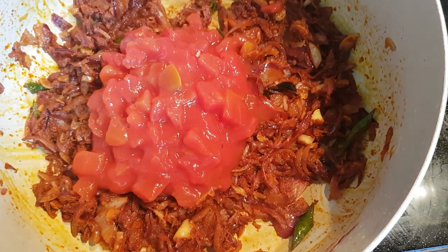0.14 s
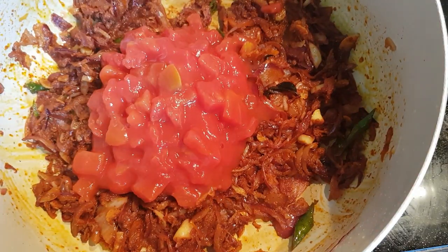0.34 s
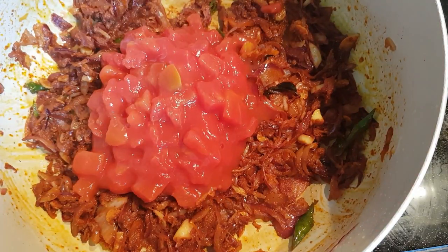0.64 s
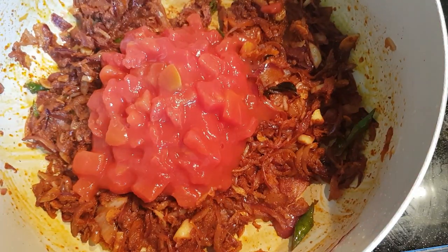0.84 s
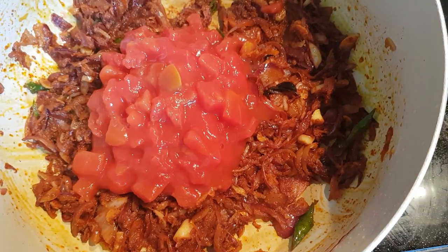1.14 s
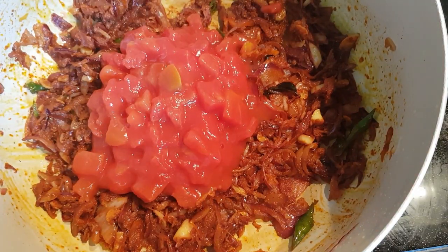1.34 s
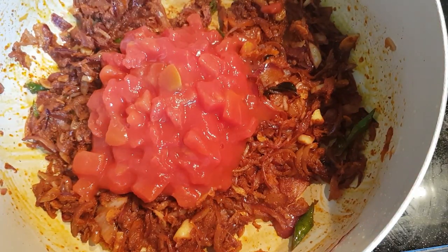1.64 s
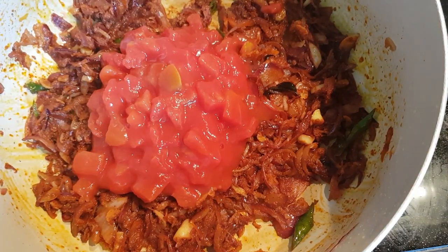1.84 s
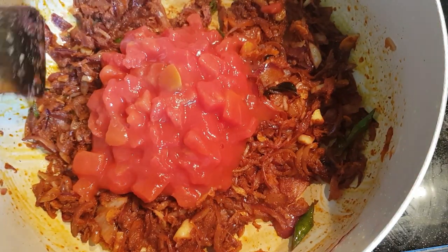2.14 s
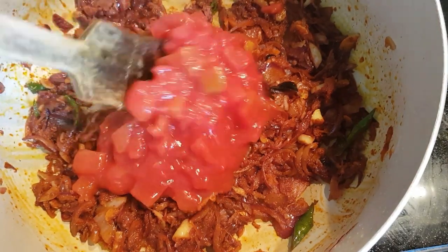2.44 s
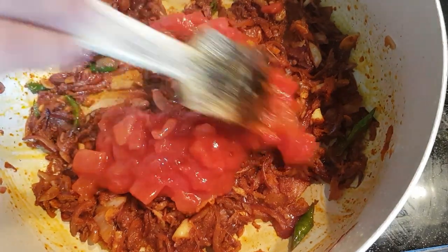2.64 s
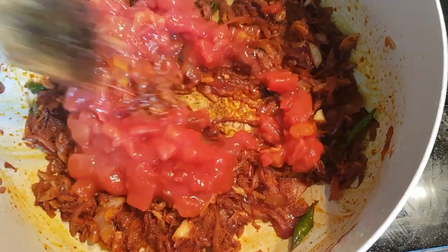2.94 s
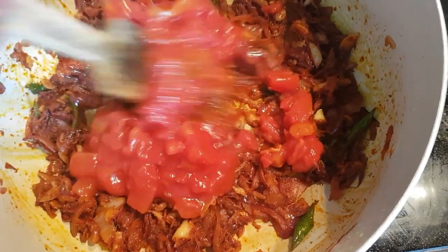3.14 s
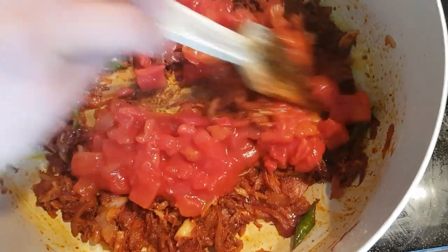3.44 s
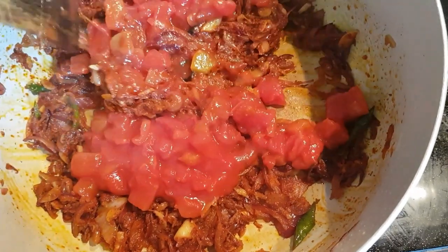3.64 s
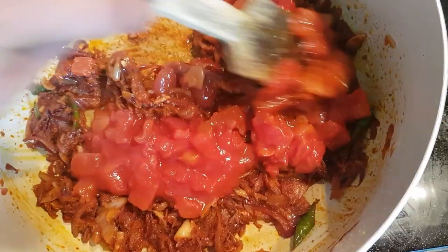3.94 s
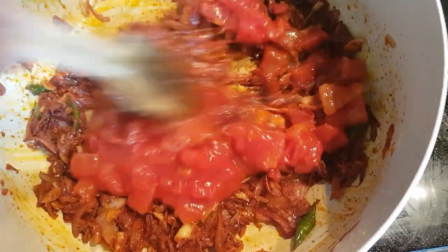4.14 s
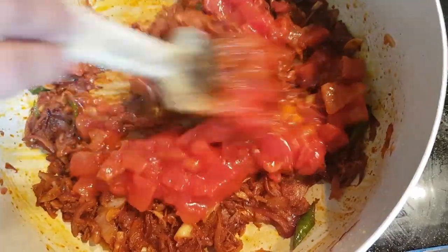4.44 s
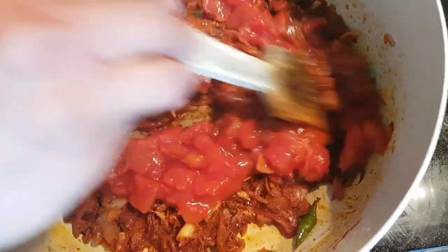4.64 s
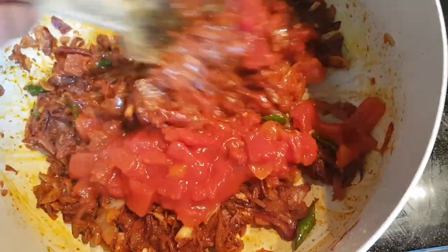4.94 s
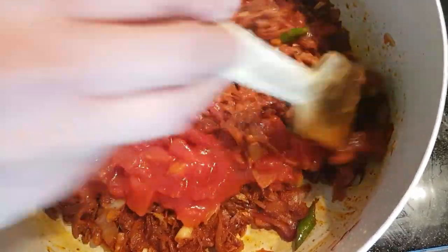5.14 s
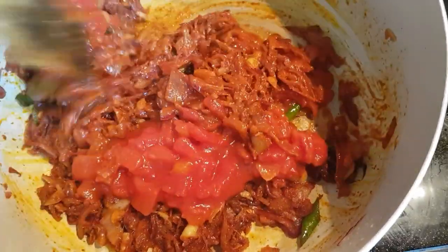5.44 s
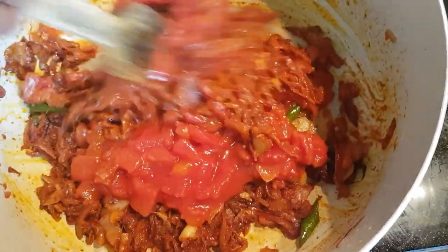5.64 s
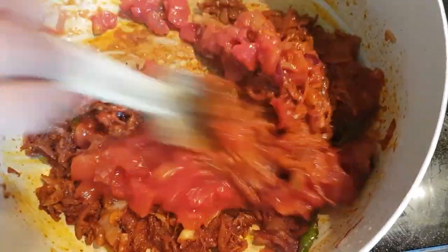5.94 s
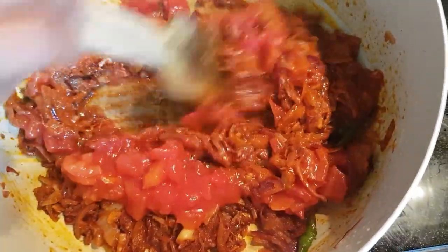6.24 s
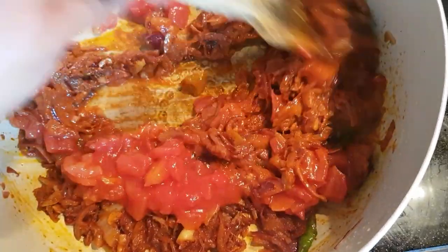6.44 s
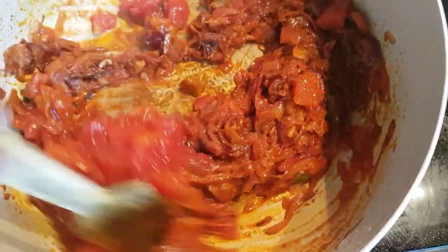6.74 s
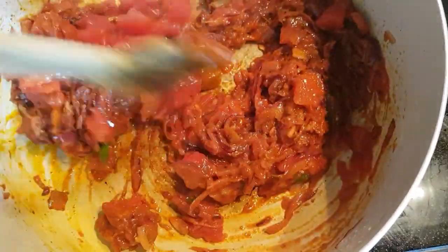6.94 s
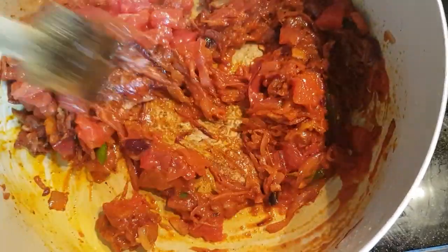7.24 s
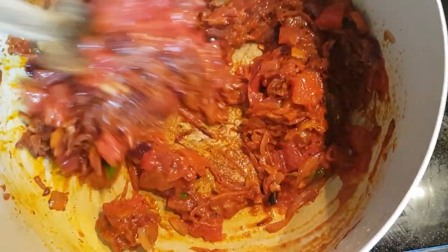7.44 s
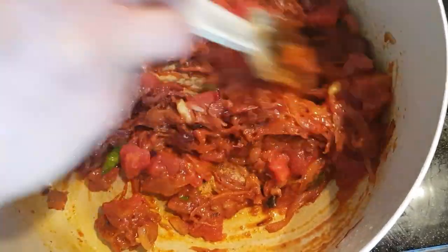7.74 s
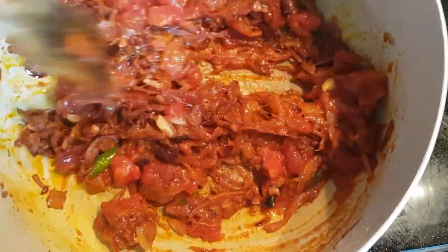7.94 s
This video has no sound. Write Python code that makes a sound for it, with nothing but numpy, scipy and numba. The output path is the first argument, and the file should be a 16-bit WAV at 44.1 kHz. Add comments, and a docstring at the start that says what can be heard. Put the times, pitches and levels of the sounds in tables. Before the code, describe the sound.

Chopped tomatoes and onions sizzle and bubble in a wide metal pan, close to the microphone, with a faint low kitchen fan hum throughout. Oil spits a few times early on. Around 1 second a wooden spatula gives a quick cluster of knocks, and from 2.3 seconds it stirs with irregular clacks and chatter, the pan thudding lightly on its stove grate. Near 3 seconds the frying swells and a raspy steam whistle rises, strongest around 3.5 seconds, returning more weakly after 4. The hardest knock lands at 5 seconds, ending the whistle, and another strong one follows at 5.6. The sizzle then sinks, flaring briefly with the strokes. Two short, soft scrapes come near 6.7 seconds, then lighter knocks and a flurry of sharp spits from 7 to 8 seconds. The knocks carry a slight echo from hard kitchen walls.

```python
"""Chopped tomatoes sizzle among onions in a wide metal pan, close under a phone with two microphone
ports; a kitchen fan hums behind and oil spits now and then. From about 1 s a wooden spatula stirs,
knocking the pan, which rocks on its stove grate. Near 3 s it bares hot metal: the frying swells and
steam whistles until the hardest knock, at 5 s. The sizzle sinks as the tomato spreads and cools the pan,
and the stirring ends with two short scrapes, lighter knocks and a flurry of spits."""
import sys
import numpy as np
from scipy import signal
from scipy.fft import rfft, irfft, next_fast_len
from scipy.io import wavfile
from scipy.ndimage import uniform_filter1d
from numba import njit

SR = 44100
rng = np.random.default_rng(int(sys.argv[2]) if len(sys.argv) > 2 else 0)


def master(y):
    """Save y as 16-bit WAV."""
    cut = np.clip(np.atleast_2d(y).T, -1, 1)
    pcm = np.round(cut * 32767)  # scale
    wavfile.write(sys.argv[1], SR, pcm.astype(np.int16))


N = 356896

# The pan's modes, damped by the food on the metal. Each row: pitch in Hz, level in dB, t60 in seconds.
PAN_MODES = [(428, 16.5, 0.05), (639, 14.5, 0.065), (810, 12, 0.02), (1030, 21, 0.037), (1160, -16, 0.024),
             (1370, -6, .03), (1954, 14, 0.058), (2530, 11, 0.08), (2374, 20, 0.076), (3400, -12, 0.24),
             (3780, -36, 0.044)]


def undb(db):
    return 10 ** (np.asarray(db) / 20)


def level(x, db=0, first=None):
    """Sets the rms level, judged on the whole sound or on its first samples."""
    return x * undb(db) / np.sqrt(np.mean(x[..., :first] ** 2))


def across(points, hz):
    """Points joined on a log-frequency axis."""
    point_hz, values = np.transpose(points)
    return np.interp(np.log(hz + 1), np.log(point_hz), values)


def along(table):
    """Points joined in time: one envelope for each column after the first."""
    s, *columns = np.transpose(table)
    return [np.interp(np.arange(N) / SR, s, c) for c in columns]


def sides(db):
    """Stereo gains for a balance of left minus right in dB."""
    return undb(np.array([[db], [-db]]) / 2)


def walk(rate):
    """Random levels held 1 / rate s and smoothed twice; spread near 1."""
    hold = int(SR / rate)
    steps = np.repeat(rng.standard_normal(N // hold + 1), hold)
    return 1.3 * uniform_filter1d(uniform_filter1d(steps, hold), hold)[:N]


def clicks(rate, count):
    """Impulses of random size and timing, on average rate a second."""
    return (rng.random(count) < rate / SR) * rng.standard_normal(count)


def add(out, x, s):
    i = int(s * SR)
    out[:, i:i + x.shape[1]] += x[:, :N - i]


def fade(t, t60):
    return np.exp(-np.log(1000) * t / np.maximum(t60, .002))


@njit
def bandpass(x, hz, width):
    """State-variable band-pass with a moving centre, gain 1 at the centre."""
    y, band, low = np.empty(len(x)), 0., 0.
    for i in range(len(x)):
        g, damping = np.tan(np.pi * hz[i] / SR), width / hz[i]
        v = (band + g * (x[i] - low)) / (1 + g * (g + damping))
        band, low, y[i] = 2 * v - band, low + 2 * g * v, damping * v
    return y


def burst(t, hz, width, t60, rise_s):
    """A decaying puff of band noise, unrelated at the two ports."""
    centre = np.full(len(t), float(hz))
    noise = np.array([bandpass(n, centre, float(width)) for n in rng.standard_normal((2, len(t)))])
    return level(noise) * fade(t, t60) * (1 - fade(t, rise_s))


def ports(make, gain):
    """Two ports hear much the same bass and unrelated treble; gain is a function of Hz."""
    # Each row: frequency in Hz, share of the sound common to both ports.
    likeness = [(100, 0.93), (400, 0.74), (1000, 0.57), (2500, 0.12), (6000, 0.016)]
    left_lag_s = .0001
    size = next_fast_len(N)
    hz = np.arange(size // 2 + 1) * SR / size
    common = across(likeness, hz)
    right, unrelated = rfft(make(), size), rfft(make(), size)
    left = (common * right + np.sqrt(1 - common ** 2) * unrelated) * np.exp(-2j * np.pi * hz * left_lag_s)
    return level(irfft(np.array([left, right]) * gain(hz), size)[:, :N])


@njit
def bubbles(start, hz, size, decay, count):
    """Each bubble swells quickly and rings out as a damped sine."""
    y = np.zeros(count)
    for j in range(len(start)):
        phasor, onset = size[j] + 0j, 1.
        turn = decay[j] * np.exp(2j * np.pi * hz[j] / SR)
        for i in range(start[j], count):
            y[i] += phasor.imag * (1 - onset)
            phasor, onset = phasor * turn, onset * decay[j] ** 4
            if abs(phasor.real) + abs(phasor.imag) < size[j] / 100:
                break
    return y


def fizz(rate, spread_db, ring_s, hiss):
    """Tiny steam bubbles of every pitch, a few much louder, over a share of smooth hiss."""
    when, pitch, rarity, length = rng.random((int(rate * N / SR), 4)).T
    decay = np.exp(-np.log(1000) / (SR * ring_s * (0.59 + length)))
    size = undb(-spread_db * np.log(rarity + 0.0022))
    pops = bubbles((when * N).astype(np.int64), 200 + 15000 * pitch, size, decay, N)
    return level(pops) + hiss * rng.standard_normal(N)


def bowl(f):
    """Air in the bowl of the pan resonates: its gain at f Hz."""
    # Each row: centre in Hz, width in Hz, gain in dB.
    air_modes = [(590, 67, -6), (1020, 65, 16), (1515, 190, 0.5)]
    return 1 + sum(undb(db) / np.abs(1 + 2j * (f - hz) / width) for hz, width, db in air_modes)


def frying():
    """Fine sizzle in oil, coarser bubbling in the juice and a low simmer of pan and burner."""
    # The pan cools as the tomato spreads. Each row: time in seconds, base sizzle and bubbling in dB.
    fry_levels = [(0, -44.5, -46), (.7, -39, -44), (1.2, -39, -42), (2.1, -38.5, -45.5), (2.7, -37.5, -42),
                  (3.1, -33, -40), (3.5, -34, -39), (4.1, -34.5, -39.5), (4.6, -35, -41.5), (5.1, -41, -43),
                  (5.6, -41, -45.5), (5.9, -46, -48.5), (6.5, -45, -51), (7, -47, -53), (7.4, -48, -55.5),
                  (8.09, -49.5, -55)]
    # Each row: time in seconds, base level of the simmer in dB.
    simmer_levels = [(0, -53.5), (1, -45), (2, -48), (3, -50), (4, -46), (5, -45.5), (6, -55.5), (7, -59.5),
                     (8.09, -57)]
    # The tone of the three layers. Each row: frequency in Hz, relative spectral density in dB.
    sizzle_tone = [(1180, -20), (2000, -6), (2630, -5.5), (2760, -8), (3130, -4), (3910, -3), (6170, -3),
                   (6820, -2.5), (11500, -4), (13900, -6), (14500, -15.5)]
    bubbling_tone = [(400, -6.5), (700, -5.5), (1000, -9), (1500, -3.5), (2600, 0), (4000, -6), (7000, -16)]
    simmer_tone = [(30, 6.5), (60, -5), (110, -7), (170, -11), (300, -12), (480, -6.5), (750, -14.5),
                   (1200, -23.5)]
    sizzle = ports(lambda: fizz(rate=7000, spread_db=2.6, ring_s=.031, hiss=1.0),
                   lambda f: undb(across(sizzle_tone, f)))
    bubbling = ports(lambda: fizz(rate=9000, spread_db=1.5, ring_s=.02, hiss=1.3),
                     lambda f: undb(across(bubbling_tone, f)) * bowl(f))
    simmer = ports(lambda: rng.standard_normal(N),
                   lambda f: undb(across(simmer_tone, f)) * bowl(f) * (f < 1400))
    sizzle_db, bubbling_db = along(fry_levels)
    lift_db = flares()
    sizzle_flicker, bubbling_flicker, joint_flicker = [undb(.6 * walk(18)) for _ in range(3)]
    sizzle *= undb(sizzle_db + lift_db) * sizzle_flicker
    bubbling *= undb(bubbling_db + .8 * lift_db) * bubbling_flicker
    simmer *= undb(along(simmer_levels)[0] + 2 * walk(10))
    return sides(-2) * ((sizzle + bubbling) * joint_flicker + simmer)


def fan():
    """The fan's low hum wavers a little in pitch and level."""
    hz = 49.5 * (1 + .055 * walk(14))
    hum = np.sin(2 * np.pi * np.cumsum(hz) / SR) * undb(1.6 * walk(9))
    return sides(-1.4) * level(hum, db=-50)


def spits():
    """A drop hits hot oil: a sharp crack, then a short spray of steam."""
    # Each row: start in seconds, base level in dB, centre in Hz, left minus right in dB.
    drops = [(0.4866, -34, 5340, 0), (0.948, -30, 9050, -8), (1.153, -30, 8000, -11),
             (4.6613, -46, 2800, 2), (5.221, -36, 4070, 2), (5.258, -43, 2470, -11),
             (5.983, -27.5, 6500, -4), (6.589, -38, 5660, 1), (6.972, -38, 2480, -4),
             (7.183, -40, 7460, -11), (7.2622, -37, 3070, -7), (7.45, -34.5, 6040, -3),
             (7.492, -27, 7000, -3), (7.7746, -23.5, 7760, -5), (7.8125, -38, 6900, -10),
             (7.858, -40, 11400, 4), (7.9137, -38, 7750, -1), (7.9633, -39, 4670, -3)]
    out, t = np.zeros((2, N)), np.arange(int(.15 * SR)) / SR
    for s, db, hz, side_db in drops:
        crack = undb(4.5) * burst(t, hz, width=.6 * hz, t60=.022, rise_s=.006)
        spray = undb(-9) * burst(t, hz, width=.7 * hz, t60=.07, rise_s=.017)
        add(out, sides(side_db) * undb(db) * (crack + spray), s)
    return out


def ring(modes, t, favoured_hz, db_per_octave, spread_db, port_phase):
    """One blow's ring: the place struck favours modes near one pitch."""
    hz, db, t60 = np.transpose(modes)[:, :, None]
    detune, skew, strength, phase = rng.standard_normal((4, len(modes), 1))
    angle = 2 * np.pi * hz * (1 + .015 * detune) * t + .6 * phase
    # the ports catch the higher modes out of step
    shift = port_phase * (1 + .4 * skew) * np.minimum(hz / 1000, 1) ** 2
    db = db - np.abs(np.log2(hz / favoured_hz)) * db_per_octave + spread_db * strength
    envelope = undb(db) * fade(t, t60) * (1 - np.exp(-t * hz * 3.6))
    x = np.sum(envelope * np.sin([angle - shift, angle]), axis=1)
    return x / np.abs(x).max()


def spatula():
    """Each blow clacks dry wood, rings pan and grate, ticks, then chatters as wood drags over metal."""
    # Each row: start in seconds, levels of knock, grate and tick in dB, left minus right in dB,
    # chatter in dB against the blow, favoured pitch of the knock and of the grate in Hz.
    blows = [(0.891, -43, -62, -49, -2, -32, 600, 100), (1.163, -28.5, -41, -46, -3, -11, 990, 200),
             (0.928, -23, -33, -28.5, -4, -15.5, 865, 203), (1.155, -26.5, -39, -27, -2.5, -17, 810, 200),
             (2.264, -39, -36, -56, -5.5, -10, 450, 137), (2.301, -54, -42, -53, 7, -25, 406, 61.9),
             (2.335, -41, -35.5, -51, -2.5, -11, 1000, 99.6), (2.374, -45, -48, -43, 0, -18, 1040, 61.9),
             (2.553, -38, -28, -40, 0.5, -17.5, 382, 224), (2.58, -51, -42, -41, -7, -27, 388, 67.3),
             (3.157, -31, -31, -33, 0, -13.5, 830, 153), (3.791, -43, -33.5, -31, 1, -29, 1060, 64.6),
             (4.405, -43, -41, -34, -2, -4.5, 980, 74), (4.694, -41, -32.5, -61, 1.5, -16, 635, 201),
             (4.971, -10.5, -26, -26, -2.5, -35, 870, 153), (5.245, -35.5, -39, -54, -4, -23, 1030, 234),
             (5.278, -32.5, -30.5, -37.5, 1.5, -18, 369, 256),
             (5.591, -17.5, -25, -25, -2.5, -33, 1045, 248), (5.654, -61, -32, -41, 2, -9, 956, 113),
             (5.958, -60, -46, -39, -4, -5, 1040, 61.9), (6.198, -45.5, -35, -40, 2.5, -10, 638, 144),
             (6.618, -52, -48.5, -58, -3, -12, 1380, 120), (7.142, -37, -55, -39.5, -3, -21, 644, 118),
             (7.158, -34, -32, -53, 1, -17, 655, 121), (7.46, -45, -33.5, -49, -4, -8.5, 358, 240),
             (7.491, -28.5, -35.5, -33.5, -1.5, -22, 616, 243), (7.648, -60, -44.5, -59, 2.5, -9, 563, 121)]
    # Modes of the spatula and the stove grate. Each row: pitch in Hz, level in dB, t60 in seconds.
    wood_modes = [(526, -0.5, 0.015), (864, 4, 0.011), (1060, 0, 0.019), (1520, 0.5, 0.03),
                  (2090, -9.5, 0.057), (3350, 1, 0.014)]
    grate_modes = [(72, 1.5, 0.25), (108, 3, 0.14), (123.7, 3, 0.11), (190, -4.5, 0.095),
                   (199.1, -2.5, 0.19), (237, 6.5, 0.098), (309, -3.5, 0.1)]
    # Blows on bare metal sound higher and ring more.
    # Each row: favoured pitch in Hz, pan level in dB against the wood.
    bare_metal = [(400, -8.5), (700, -5), (1000, -2.5), (1040, 15)]
    out, t = np.zeros((2, N)), np.arange(int(.3 * SR)) / SR
    for s, knock_db, grate_db, tick_db, side_db, chatter_db, knock_hz, grate_hz in blows:
        force = clicks(900, len(t)) * undb(chatter_db) * fade(t, t60=.55)
        force[0] = -1  # the blow itself, ahead of its chatter
        # food between wood and metal lengthens the push and dulls the knock; hard blows touch briefly
        contact_s = .00024 if knock_db > -32 else .00077
        push = np.sin(np.pi * np.clip(t[:200] / contact_s, 0, 1))
        wood = ring(wood_modes, t, knock_hz, db_per_octave=5.5, spread_db=.33, port_phase=1.67)
        pan = ring(PAN_MODES, t, knock_hz, db_per_octave=13, spread_db=1, port_phase=1.78)
        pan *= undb(np.interp(knock_hz, *np.transpose(bare_metal)))
        knock = level(signal.fftconvolve(wood + pan, push[None])[:, :len(t)], knock_db, first=300)
        grate = ring(grate_modes, t, grate_hz, db_per_octave=5.4, spread_db=1.24, port_phase=2.3)
        grate = level(grate, grate_db, first=700)
        tick = undb(tick_db) * burst(t, hz=2480, width=1870, t60=.13, rise_s=.002)
        rocking = force * np.where(t > 0, .45, 1)  # only part of the chatter reaches grate and tick
        blow = signal.fftconvolve(knock, force[None]) + signal.fftconvolve(grate + tick, rocking[None])
        add(out, sides(side_db) * blow, s)
    return out


def flares():
    """Juice meets bare hot metal: the frying's lift in dB, quick up and a little slower down."""
    # Each row: time of the peak in seconds, lift in dB.
    peaks = [(.94, 3.5), (2.55, 1), (3.2, 3), (3.58, 4), (3.85, 2.5), (4.3, 2), (4.8, 4), (5.3, 1.5),
             (5.45, 2), (5.72, 3.5), (6.2, 3.5), (6.9, 2), (7.26, 4.5), (7.55, 5.5), (7.93, 4)]
    rise_s, fall_s = .076, .089
    s, db = np.transpose(peaks)[:, :, None]
    t = np.arange(N) / SR - s
    return np.sum(db * np.exp(-(t / np.where(t < 0, rise_s, fall_s)) ** 2), axis=0)


def rasp(hz, width):
    """Bursting bubbles: clicks of unequal size over smooth hiss, through one resonance."""
    crackle = clicks(3000, N) * undb(1.5 * rng.exponential(size=N))
    return level(bandpass(level(crackle) + .72 * rng.standard_normal(N), hz, width))


def steam():
    """Steam whistles under the lifted heap, through two gaps that change as it slides."""
    # Each row: time in seconds, lower and upper resonance in Hz, base level in dB.
    gaps = [(2.8, 1400, 2500, -47), (3.2, 1520, 2620, -40.5), (3.32, 1570, 2880, -34.5),
            (3.45, 1770, 2860, -34), (3.56, 1950, 3000, -34.5), (3.7, 2000, 2700, -57),
            (4.2, 1970, 2980, -40), (4.8, 2240, 2660, -44), (5, 2200, 2680, -41)]
    # A thin bright sheen above the whistle. Each row: time in seconds, base level in dB.
    sheen_levels = [(2.7, -67), (2.95, -44), (3.3, -50), (3.65, -42), (3.95, -45), (4.3, -66)]
    low_hz, high_hz, db = along(gaps)
    jets = [undb(-3.5) * rasp(low_hz, width=200.) + undb(-.1) * rasp(high_hz, width=380.) for _ in "LR"]
    whistle = level(np.array(jets)) * undb(db)
    sheen = np.array([rasp(np.full(N, 7700.), width=350.) for _ in "LR"]) * undb(along(sheen_levels)[0])
    t = np.arange(N) / SR
    escaping = (t > gaps[0][0]) * (t < gaps[-1][0])
    return (whistle + sheen) * undb(1.5 * walk(30)) * escaping


def scrapes():
    """Dense slips of wood on the pan floor keep the metal ringing for the length of the rub."""
    # Each row: start and length in seconds, level in dB, favoured pitch of the pan in Hz.
    rubs = [(6.677, 0.16, -50, 820), (6.834, 0.044, -51, 915)]
    out, t = np.zeros((2, N)), np.arange(int(.3 * SR)) / SR
    for s, length_s, db, pan_hz in rubs:
        slips = clicks(1500, len(t)) * np.sin(np.pi * np.clip(t / length_s, 0, 1))
        pan = ring(PAN_MODES, t, pan_hz, db_per_octave=15, spread_db=3.5, port_phase=1.1)
        rub = signal.fftconvolve(pan, slips[None])
        add(out, level(rub, db, first=int(length_s * SR)), s)
    return out


def walls(hits):
    """Hard kitchen walls: a dull tail after the first bounce, its bass the same at both ports."""
    t60, first_bounce_s, tail_db = .49, .004, -16.5
    t = np.arange(int(.5 * SR)) / SR
    noise = rng.standard_normal((3, len(t)))
    common, separate = noise[0], noise[1:]
    diffuse = separate + uniform_filter1d(common - separate, size=40)
    tail = uniform_filter1d(diffuse, size=5) * fade(t, t60) * (t > first_bounce_s)
    tail /= np.sqrt(np.sum(tail ** 2) / 2)
    return undb(tail_db) * signal.fftconvolve(hits, tail, axes=1)[:, :N]


def scene():
    """Knocks, scrapes and spits echo off the walls, over a dry bed of frying, steam and fan."""
    hits = spatula() + scrapes() + spits()
    return hits + walls(hits) + frying() + steam() + fan()


def record(dry):
    """The phone rounds the loudest peak, thins the lowest bass and cuts the top."""
    bottom_hz, top_hz = 36, 14650
    rounded = dry / (1 + dry ** 4) ** .25
    thinned = signal.sosfilt(signal.butter(2, bottom_hz, "high", fs=SR, output="sos"), rounded)
    return signal.sosfilt(signal.ellip(12, .2, 80, top_hz, fs=SR, output="sos"), thinned)


dry = scene()
out = record(dry)
master(out)
```